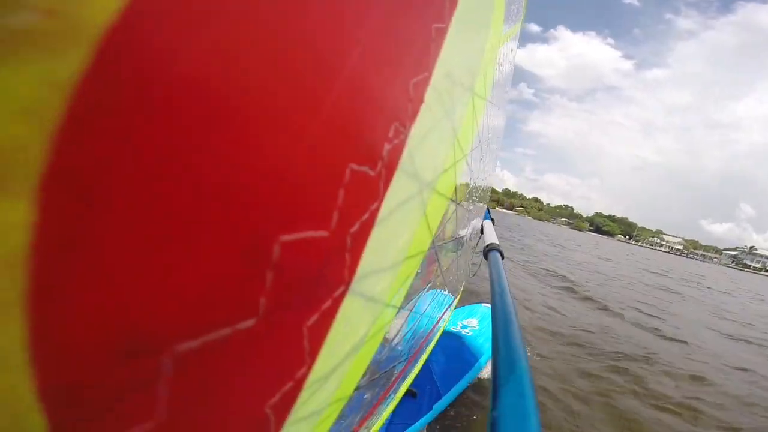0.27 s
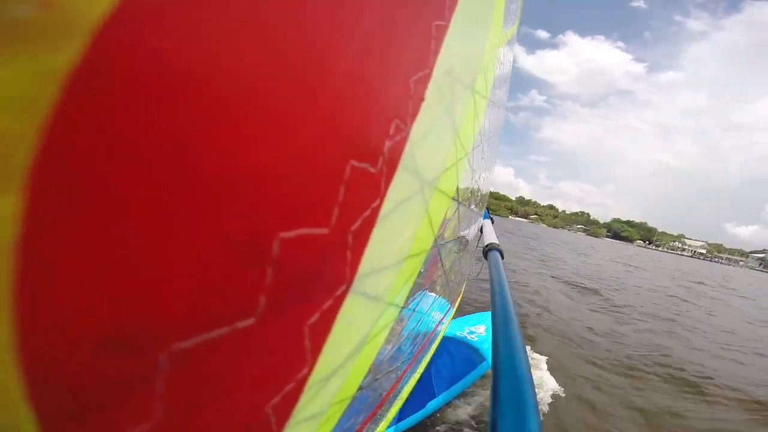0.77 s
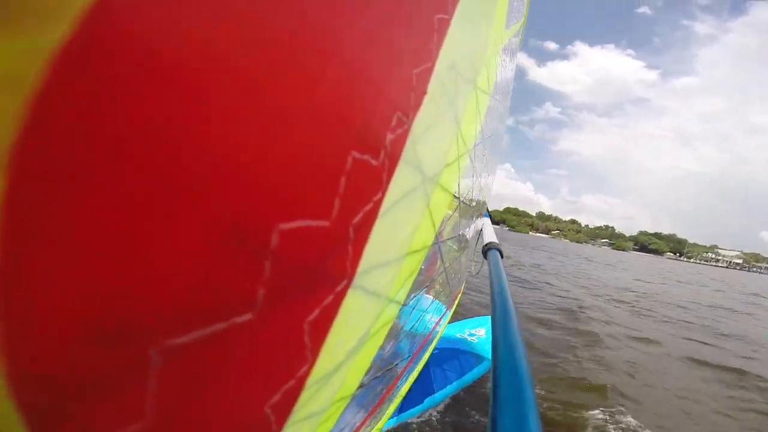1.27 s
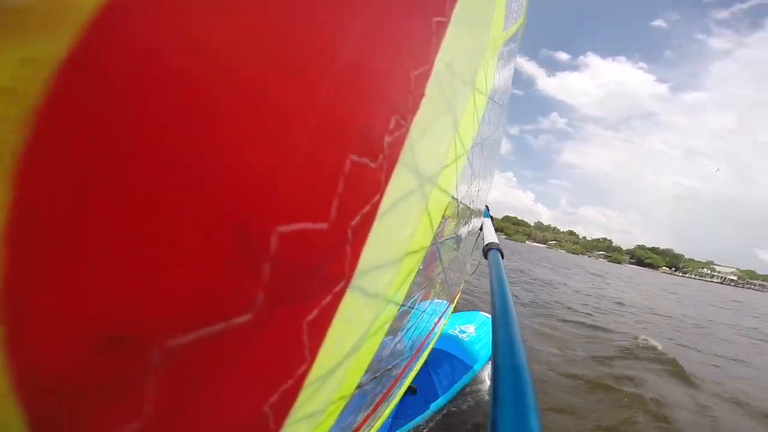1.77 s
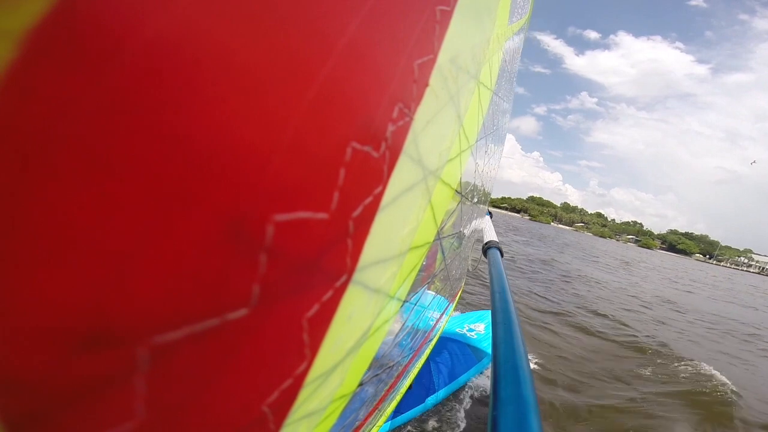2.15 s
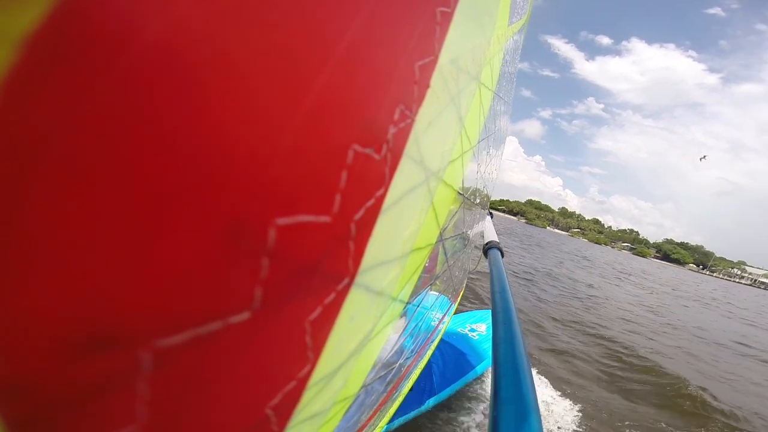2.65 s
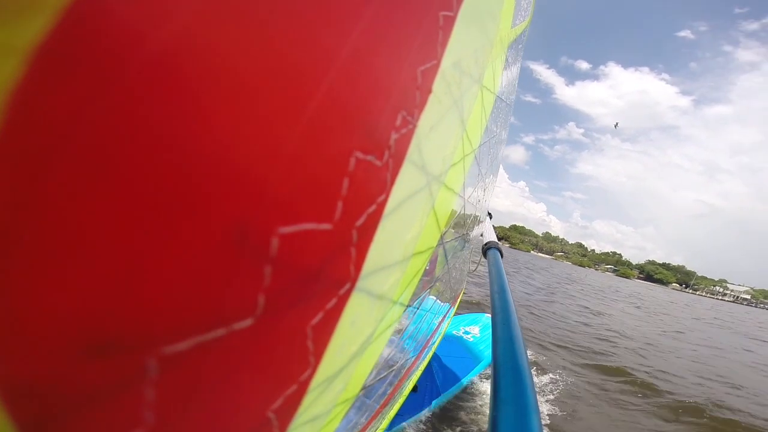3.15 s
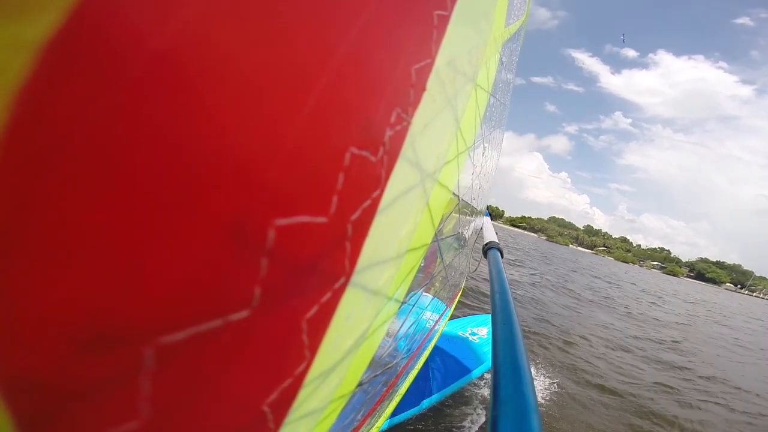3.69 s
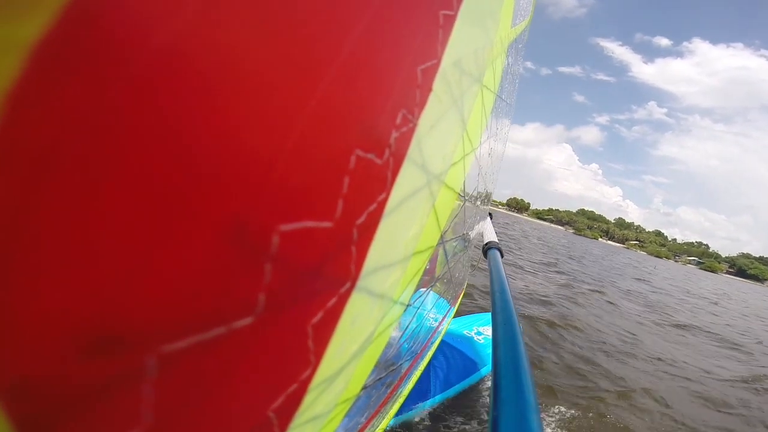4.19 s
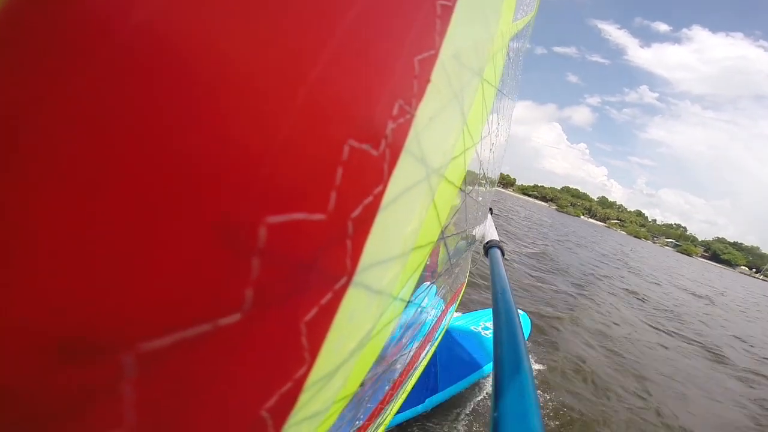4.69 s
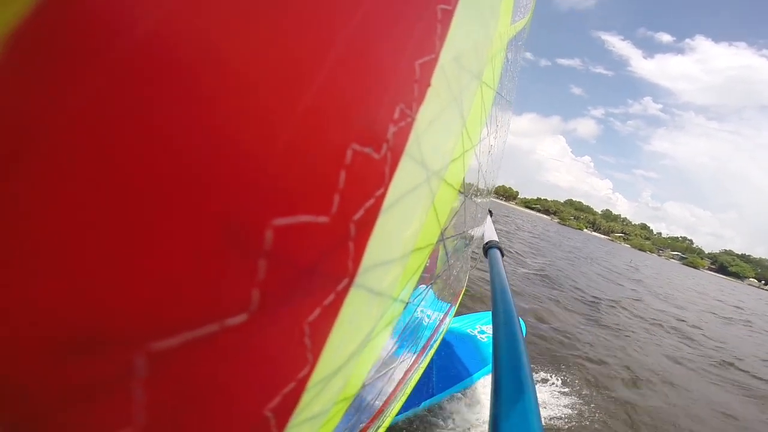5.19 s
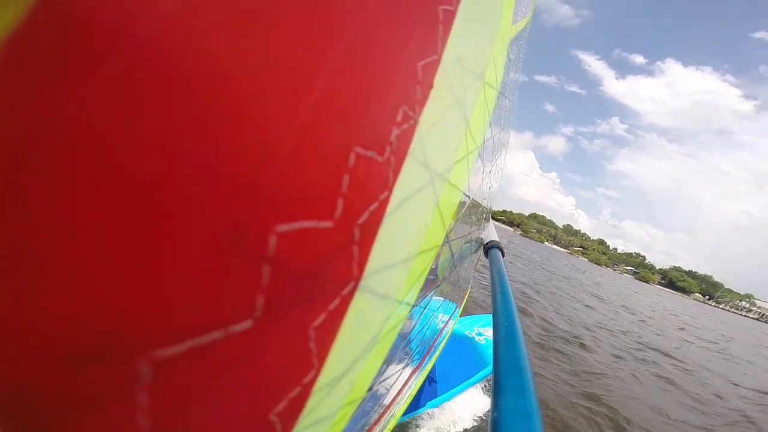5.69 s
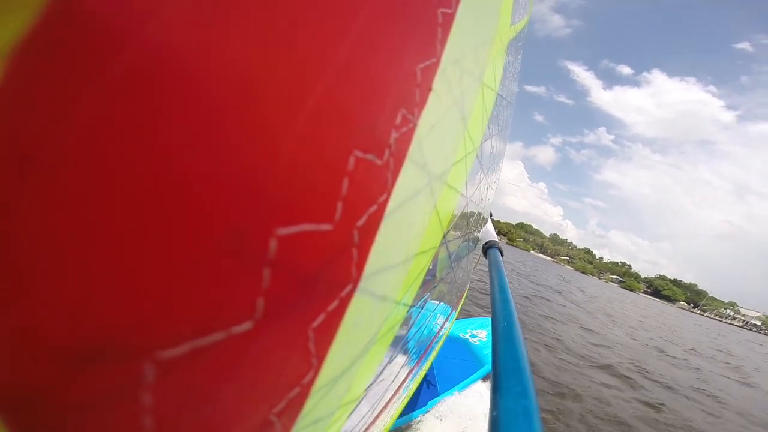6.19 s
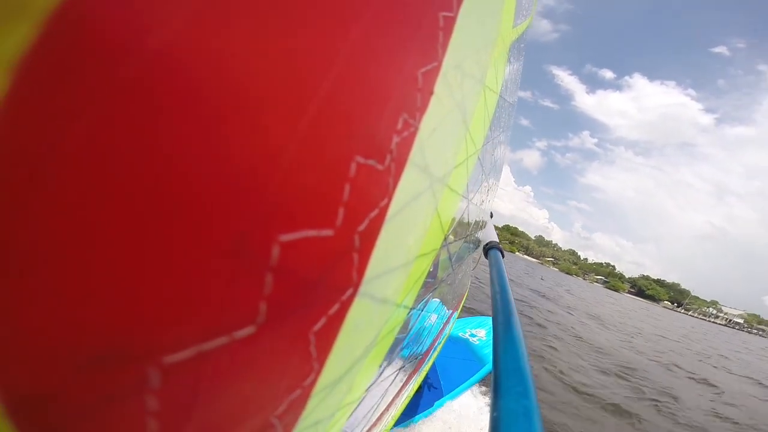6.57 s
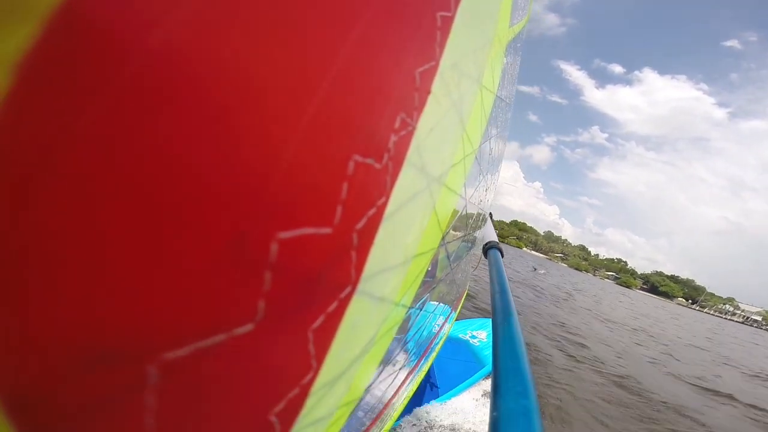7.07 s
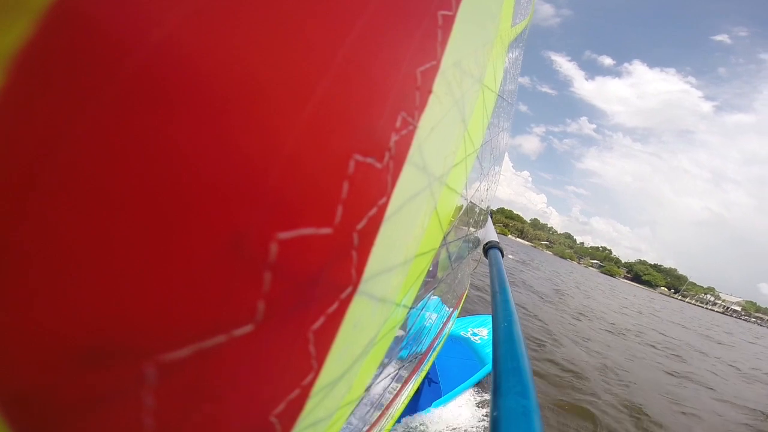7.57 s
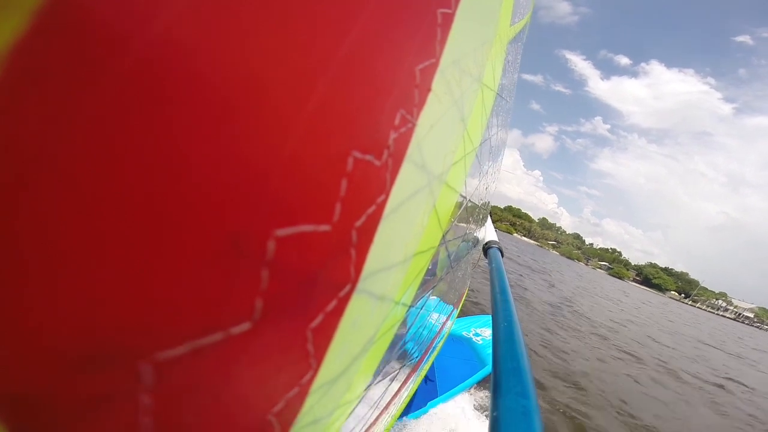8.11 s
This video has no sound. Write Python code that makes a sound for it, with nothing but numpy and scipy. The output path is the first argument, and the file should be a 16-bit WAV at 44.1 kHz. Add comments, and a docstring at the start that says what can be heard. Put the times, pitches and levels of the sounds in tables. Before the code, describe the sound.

Muffled, boomy knocks and cracks of waves slapping a windsurf rig, heard inside a plastic housing, with deep rumble, clamp creaks and thin water hiss.

```python
"""Wave slaps crack, knock and thud through the boom of a windsurf rig planing over chop: clicks set its modes ringing.
They are heard by a microphone in a closed plastic housing clamped to that boom.
The clamp creaks in trains of slips and snaps in single ones; the housing rattles in short bursts of noise.
Wind and waves shake the boom in a deep rumble of narrow noise bands; the rush of water is a thin, resonant
hiss through the housing wall over a dull wash of banded noise."""
import sys
import numpy as np
from scipy import signal
from scipy.io import wavfile
from scipy.ndimage import uniform_filter1d

SR = 44100
rng = np.random.default_rng(int(sys.argv[2]) if len(sys.argv) > 2 else 0)


def wav_record(signal):
    """Record a signal, one row per channel, as 16-bit PCM in the file named by sys.argv[1]."""
    frames = np.transpose(np.atleast_2d(signal))
    bounded = np.clip(frames, -1, 1)
    # unit amplitude maps onto the largest positive 16-bit level
    quanta = np.round(bounded * 32767).astype(np.int16)
    wavfile.write(sys.argv[1], SR, quanta)


N = 367794  # samples


def from_db(db):
    """Decibels to an amplitude factor."""
    return 10 ** (np.asarray(db) / 20)


def rms_one(x):
    """Scale a signal to an rms of 1."""
    return x / np.sqrt(np.mean(x ** 2) + 1e-20)


def in_time(rows):
    """Columns of a curve table, drawn as straight lines with one value per sample."""
    s, *columns = np.transpose(rows)
    return [np.interp(np.arange(N) / SR, s, column) for column in columns]


def drift(rate_hz):
    """Slow chance of spread 1: coarse noise through a double one-pole low-pass."""
    step = 40  # samples between coarse points
    r = np.exp(-2 * np.pi * rate_hz * step / SR)
    coarse = rng.standard_normal(N // step + 2002)
    slow = signal.lfilter([1], [1, -2 * r, r * r], coarse)[2000:]  # skip the filter's run-in
    return np.interp(np.arange(N) / step, np.arange(len(slow)), rms_one(slow))


def ring(clicks, hz, t60, phase):
    """A unit click sets a sine of height 1 ringing from the given phase; it falls 60 dB in t60 seconds."""
    r = np.exp(-np.log(1000) / (t60 * SR))
    w = 2 * np.pi * hz / SR
    b, a = [np.sin(phase), r * np.sin(w - phase)], [1, -2 * r * np.cos(w), r * r]
    return signal.lfilter(b, a, clicks + 1e-18)


def resonance(x, hz, width_hz):
    """Band-pass with gain 1 on top, passed twice for steep flanks."""
    r = np.exp(-np.pi * width_hz / SR)
    b = (1 - r * r) / 2 * np.array([1, 0, -1])
    a = [1, -2 * r * np.cos(2 * np.pi * hz / SR), r * r]
    return signal.lfilter(b, a, signal.lfilter(b, a, x))


def butter(x, hz, kind, order=2):
    """Butterworth filter."""
    return signal.sosfilt(signal.butter(order, hz, kind, fs=SR, output="sos"), x)


def banded_noise(spectrum, patchy_db):
    """Half-octave noise bands, each with its own flicker on a shared swell; rms 1."""
    hz, level_db = np.transpose(spectrum)
    edges = hz[0] * np.sqrt(2) ** np.arange(int(2 * np.log2(hz[-1] / hz[0])) + 2)
    together = drift(32.0)
    white = rng.standard_normal((2, N))  # neighbouring bands use different noise
    out = 0
    for k, (low, high) in enumerate(zip(edges, edges[1:])):
        own_db = np.interp(np.log(low * high) / 2, np.log(hz), level_db)
        flicker_db = patchy_db * (0.89 * together + drift(26.0))
        out = out + from_db(own_db + flicker_db) * butter(white[k % 2], [low, high], "band")
    return rms_one(out)


def strike(modes, at_s, level_db, spread_db, signs, tilt_db=0, phase=0):
    """Every blow rings all modes, in wandering shares; thrown modes (phase > 0) start alike, others in turn."""
    at = np.minimum((at_s * SR).astype(int), N - 1)
    out = np.zeros(N)
    for k, (hz, mode_db, t60) in enumerate(modes):
        clicks = np.zeros(N)
        share_db = mode_db + tilt_db * np.log2(hz / 1000) + spread_db * drift(33.7)[at]
        np.add.at(clicks, at, signs * from_db(level_db + share_db))
        direction = 1 if phase else (-1) ** k
        out += direction * ring(clicks, hz, t60, phase)
    return out


# Plastic housing resonances. Each row: frequency in Hz, width in Hz, share in the hiss in dB,
# share in the rattle in dB.
HOUSING = [(1753, 745, 5, 12), (2330, 880, -19, 6.5), (2998, 410, 10.5, -37), (3810, 130, -3.5, 5),
           (4375, 530, -6.5, -19.5), (5080, 650, -6, -44), (6040, 470, -10.5, 4), (6840, 2700, -19, -24.5),
           (9400, 830, -23, -15.5), (11700, 4100, -28.5, -43)]


def housing(x, column):
    """The housing resonances, weighted by one column of their table."""
    return sum(from_db(row[column]) * resonance(x, row[0], row[1]) for row in HOUSING)


# Tone of the spray and of the wash. Each row: frequency in Hz, relative density in dB per Hz.
SPRAY = [(1000, 11.5), (2500, -2), (5000, -10.5), (9000, -40), (15000, -36.5)]
WASH = [(90, 20), (150, 11.5), (300, 1.5), (600, -3.5), (1000, -7), (1600, -29), (3000, -59)]
# The wash also drives the first boom mode; its level is relative to the banded wash.
WASH_BOOM_HZ, WASH_BOOM_WIDTH_HZ, WASH_BOOM_DB = 171.7, 30, -4.0


def rush(spray_db, wash_db):
    """Spray hiss through the housing wall and its resonances, brighter as it swells; a dull wash below."""
    gusts = drift(25)
    sung = 0
    for hz, width_hz, level_db, _ in HOUSING:
        flicker_db = 1.5 * (gusts + drift(56))
        sung = sung + from_db(level_db + flicker_db) * resonance(rng.standard_normal(N), hz, width_hz)
    hiss = 2.2 * rms_one(sung) + banded_noise(SPRAY, patchy_db=1.5)
    swell_db = spray_db - np.mean(spray_db)  # only the rise and fall of the curve counts
    low, high = butter(hiss, 3100, "low"), butter(hiss, 5300, "high")
    # The treble follows the whole swell, the lower hiss hardly moves.
    spray = from_db(-54.5 + 0.17 * swell_db) * low - from_db(-44.5 + swell_db) * high
    boom_wash = rms_one(resonance(rng.standard_normal(N), WASH_BOOM_HZ, WASH_BOOM_WIDTH_HZ))
    wash = banded_noise(WASH, patchy_db=1.6) + from_db(WASH_BOOM_DB) * boom_wash
    return spray + from_db(wash_db) * wash


def shaking(sway_db, hum_db):
    """Buffeting drives the two lowest bending ranges of the rig in shared lumps."""
    lumps = from_db(5.06 * drift(7.7))
    out = 0
    for hz, width_hz, level_db in ((34.6, 25, sway_db), (69.0, 26.0, hum_db)):
        rumble = rms_one(lumps * resonance(rng.standard_normal(N), hz, width_hz))
        out = out + from_db(level_db) * rumble
    return out


# Loud housing rattles. Each row: start in seconds, level in dB before the housing resonances.
RATTLES = [(1.379, -35), (1.405, -37), (1.437, -33.5), (2.183, -31), (3.083, -33), (3.419, -33),
           (4.776, -35), (5.108, -31), (5.607, -21.5), (5.701, -28.5), (8.003, -30.5)]
RATTLE_S = 0.016  # length of a loud or slap rattle
# Every slap rattles the housing: dB at a 0 dB knock, and dB gained per dB of knock.
SLAP_RATTLE_DB, SLAP_RATTLE_FOLLOWS = -25.5, 0.66


def rattles():
    """Fine chatter in the housing resonances: at each slap, in loud bursts, and in faint ones at random."""
    faint_per_s = 14
    starts = (rng.random(N) < faint_per_s / SR) * from_db(-44.5 + 3.3 * rng.standard_normal(N))
    gate = 500 * uniform_filter1d(starts, size=500)  # each faint burst lasts 500 samples
    slap_bursts = [(row[0], SLAP_RATTLE_DB + SLAP_RATTLE_FOLLOWS * row[2]) for row in SLAPS]
    for s, level_db in [*RATTLES, *slap_bursts]:
        gate[int(s * SR):int((s + RATTLE_S) * SR)] += from_db(level_db)
    soft_gate = uniform_filter1d(gate, size=120)
    chatter = soft_gate * rng.standard_normal(N) * from_db(0.82 * drift(130))
    return housing(chatter, 3)


# Clamp creaks. Each row: start in seconds, length in seconds, relative level in dB.
CREAKS = [(0.034, .006, -31), (0.045, 0.012, -13), (0.118, 0.0066, -32.5), (1.464, 0.022, -33),
          (1.509, 0.18, -5.5), (1.715, 0.0072, -19), (1.752, 0.01, -13), (1.83, 0.058, -15.5),
          (1.914, 0.001, -21), (2.141, 0.059, -20.5), (2.193, 0.013, -19.5), (2.212, 0.0073, -10.5),
          (2.237, 0.0031, -10.5), (2.439, 0.0064, -20.5), (2.642, 0.019, -24.5), (2.847, 0.044, -5.5),
          (3.111, 0.0078, -19.5), (3.228, 0.0096, -11.5), (3.243, 0.0058, -7), (3.26, 0.0052, -8),
          (4.433, .006, -22), (4.484, 0.0062, -18.5), (4.638, 0.0026, -18.5), (4.665, 0.0073, -19),
          (5.068, 0.027, -12.5), (5.752, 0.0073, -16), (7.33, 0.0059, -16.5)]
# Clamp body modes and upper modes. Each row: frequency in Hz, share in dB, t60 in seconds.
CLAMP = [(285, 5, 0.032), (511, 3, 0.044), (615, 8, 0.015), (764, -2, 0.051), (883, 5, 0.0099),
         (1080, 6.5, 0.02), (1272, 5, 0.01), (1477, 1, 0.015), (1784, -2, 0.022)]
CLAMP_TOP = [(2330, -18, 0.021), (2660, -13.5, 0.0089), (3770, -25, 0.02), (4520, -24, 0.0054)]
# A long, hard creak starts this many dB down, is up at this share of its length,
# and has gained a little more by its end.
CREAK_START_DOWN_DB, CREAK_TOP, CREAK_END_GAIN_DB = 20, 0.38, 2
# Body tilt in dB per octave about 1 kHz: its base, its gain per second of creak length (longer
# creaks rub brighter), and its loss per second elapsed (a long creak dulls as it goes on).
CREAK_TILT_DB, TILT_DB_PER_S, TILT_FALL_DB_PER_S = -1.5, 28.5, 22.5


def creaks():
    """Stick-slip in the clamp: a light creak slips slowly and evenly, a hard one fast and unevenly."""
    at_s, level_db, signs, tilt_db = [], [], [], []
    for s, length, creak_db in CREAKS:
        force = np.clip((creak_db + 19.5) / 10.0, 0, 1)  # 0 light, 1 hard
        chance = rng.standard_normal((3, 200))
        slips_per_s = 240 + 650 * force
        gaps = from_db((0.6 + 2.5 * force) * chance[0, 1:]) / slips_per_s
        since = np.cumsum(np.r_[0, gaps])
        inside = s + since <= s + length
        contour_db = np.interp(since, [0, CREAK_TOP * length, length],
                               [-CREAK_START_DOWN_DB, 0, CREAK_END_GAIN_DB])
        swell_db = force * min(length / 0.058, 1) * contour_db
        slip_db = creak_db - 6.23 * force + swell_db + (1 + 3 * force) * chance[1]
        slip_tilt_db = CREAK_TILT_DB + TILT_DB_PER_S * length - TILT_FALL_DB_PER_S * since
        slip_signs = np.sign(chance[2] + 3 * (1 - force))  # light slips nearly all jerk the same way
        at_s += list((s + since)[inside])
        level_db += list(slip_db[inside])
        signs += list(slip_signs[inside])
        tilt_db += list(slip_tilt_db[inside])
    at_s, level_db, signs = np.array(at_s), np.array(level_db), np.array(signs)
    body = strike(CLAMP, at_s, level_db, 3.0, signs, np.array(tilt_db))
    top = strike(CLAMP_TOP, at_s, level_db, 3.0, signs)
    both = butter(body, 2140, "low", order=8) + butter(top, [1950, 5000], "band", order=4)
    return from_db(-5.0) * both


# Clamp snaps. Each row: start in seconds, relative level in dB.
SNAPS = [(4.613, -13), (5.73, -14.5), (5.777, -11.5)]
SNAP_TOP_DB, SNAP_THIN_HZ = 14.5, 915  # lift of the upper modes; body modes thinned below this


def snaps():
    """A hard single slip with a quick rebound rings the clamp, its upper modes lifted."""
    s, level_db = np.transpose(SNAPS)
    s = np.r_[s, s + 0.0022]  # rebound 2.2 ms later, 3 dB softer
    level_db = np.r_[level_db, level_db - 3.0]
    body, top = (strike(modes, s, level_db, 3.5, np.ones(len(s))) for modes in (CLAMP, CLAMP_TOP))
    bright = butter(body, SNAP_THIN_HZ, "high") + from_db(SNAP_TOP_DB) * top
    return butter(bright, 4100, "low", order=3)


# Wave slaps. Each row: start in seconds, crack peak in dB, knock in dB, deep thud in dB;
# knock and thud are blow levels before the mode shares.
SLAPS = [(0.24, -32, -36, -16.5), (0.306, -21.5, -40.5, -10.5), (1.326, -45, -46.5, -20),
         (2.088, -35.5, -22, -12.5), (2.177, -35, -15, -30), (2.239, -28, -24.5, -10),
         (2.384, -40, -21, -8.5), (2.509, -13.5, -9, -30.5), (2.662, -14, -19, -31),
         (3.013, -36, -26, -18.5), (3.137, -56, -38.5, -12.5), (3.181, -41, -18.5, -19),
         (3.31, -33, -11, -27), (3.478, -37, -18, -25.5), (3.546, -16.5, -15, -4.5),
         (3.697, -18, -28.5, -14.5), (3.891, -25, -38.5, -13), (4.049, -33, -28, -20.5),
         (4.106, -34.5, -35, -16), (4.24, -29.5, -27, -1.5), (4.274, -34, -16.5, -20),
         (4.324, -23.5, -22, -6), (4.346, -36.5, -20, -5), (4.376, -19, -13, -13.5),
         (4.413, -25.5, -14, -4), (4.499, -10, -9, -0.5), (4.531, -11, -10, -3), (4.601, -10, -6.5, 0),
         (4.661, -40.5, -20, -7.5), (4.977, -36, -16.5, -19.5), (5.108, -19, -25, -11.5),
         (5.201, -31.5, -24, -28), (5.364, -39, -18, -16), (5.451, -27.5, -24, -1),
         (5.58, -13.5, -1.5, -37), (5.605, -8.5, -35.5, -11), (5.639, -20, -14, -15.5),
         (5.691, -25, -9, -15), (5.775, -25.5, -16.5, -0.5), (5.875, -14, -15, -17),
         (6.124, -35, -18.5, -7), (6.178, -17.5, -11.5, -5.5), (6.229, -42.5, -21, -7),
         (6.251, -32, -39, -8), (6.306, -23.5, -11.5, -12.5), (6.428, -35, -10, -19),
         (6.719, -37, -12, -11), (6.771, -45, -15.5, -18.5), (6.83, -26.5, -13, -10),
         (6.941, -14, -15, -13.5), (7.003, -32, -24, -3.5), (7.086, -41, -22, -17.5),
         (7.135, -45, -31, -6.5), (7.246, -23, -17, -10.5), (7.288, -13, -15, -2),
         (7.351, -14.5, -7.5, -26.5), (7.502, -16, -16, -7.5), (7.537, -19, -11.5, -14.5),
         (7.639, -19.5, -10.5, -38.5), (7.73, -19, -14, -5), (7.757, -23, -8.5, -9.5),
         (7.824, -19, -7.5, -23.5), (7.883, -27, -17, -7), (7.929, -36, -26.5, -10),
         (7.963, -16, -8.5, -30), (8.183, -16.5, -16.5, -29.5), (8.228, -44, -16, -16.5),
         (8.294, -21.5, -11.5, -30)]
# Boom modes of the knock and of the thud. Each row: frequency in Hz, share in dB, t60 in seconds.
BOOM = [(168.2, 8, 0.096), (244, -5.5, 0.0087), (287, -3.5, 0.014)]
BOOM_DEEP = [(43.7, 5, 0.098), (78.2, 4.13, 0.2)]
CRACK_HZ, CRACK_FADE_S = (198, 1430), 0.0054  # band of the crack; time constant of its splutter
CRACK_NOISE_DB = -9.0  # splutter behind the needle of a crack
KNOCK_LAG_S = 0.000989  # the boom swings back this long after the crack
JOLT_PHASE = 0.36  # radians; starting phase of the thrown boom modes


def slaps():
    """A blunt blow, given one direction here: a needle-like crack, then thud and knock as the boom swings back."""
    s, crack_db, knock_db, thud_db = np.transpose(SLAPS)
    spread_db, signs = 2.5, -np.ones(len(s))
    knock = strike(BOOM, s + KNOCK_LAG_S, knock_db, spread_db, signs, phase=JOLT_PHASE)
    thud = strike(BOOM_DEEP, s + KNOCK_LAG_S, thud_db, spread_db, signs, phase=JOLT_PHASE)
    clicks = np.zeros(N)
    clicks[(s * SR).astype(int)] = from_db(crack_db)
    fade = signal.lfilter([1], [1, -np.exp(-1 / (CRACK_FADE_S * SR))], clicks + 1e-18)
    per_band = SR / (2 * (CRACK_HZ[1] - CRACK_HZ[0]))  # makes up for what the band filter removes
    splutter = from_db(CRACK_NOISE_DB) * np.sqrt(per_band) * fade * rng.standard_normal(N)
    crack = butter(per_band * clicks + splutter, CRACK_HZ, "band")
    return butter(knock + thud, 446, "low", order=3) + butter(crack, 4100, "low")


# Rise and fall of the rig's low shaking. Each row: time in seconds, slow sway in dB, boom hum in dB.
SHAKE = [(0.0, -12, -33), (0.42, -9, -35.5), (0.67, -16, -61), (1.32, -16.5, -29), (1.81, -12, -38.5),
         (2.32, -12.5, -11), (2.79, -14.5, -23.5), (3.97, -12, -28.5), (4.41, -21.5, -14),
         (4.85, -16.5, -22), (5.2, -15.5, -18), (8.34, -22.5, -18)]
# Rush of water. Each row: time in seconds, spray treble in dB (used about its mean), low wash in dB.
RUSH = [(0, -71.5, -22.5), (.3, -69.5, -33.5), (.75, -69, -31), (1.4, -75.5, -23), (2.4, -66.5, -24.5),
        (2.8, -72, -25.5), (4.4, -71.5, -28), (4.85, -70.5, -21.5), (5.7, -69, -25), (6.0, -65.5, -26),
        (6.65, -59.5, -22), (6.85, -65, -23.5), (7.22, -65, -26.5), (7.35, -69.5, -25.5), (7.9, -64, -20),
        (8.34, -59.5, -19.5)]
# One wave sloshes over the deck: centre, half length, and swell of the wash.
SLOSH_S, SLOSH_HALF_S, SLOSH_DB = 5.775, 0.04, 12


def scene():
    """All sources meet at the one microphone; the low wash swells with each jolt of the rig."""
    rig = shaking(*in_time(SHAKE)) + slaps()
    power = uniform_filter1d(rig ** 2, size=900) / np.mean(rig ** 2)
    jolt_db = 10 * np.log10(power + 0.0041)
    spray_db, wash_db = in_time(RUSH)
    slosh_db = SLOSH_DB * np.exp(-((np.arange(N) / SR - SLOSH_S) / SLOSH_HALF_S) ** 2)
    water = rush(spray_db, wash_db + slosh_db + 0.67 * jolt_db)
    return (rig + creaks() + snaps() + rattles() + water)[None]


def record(dry):
    """Gain control pulls loud peaks down and recovers slowly; peaks are rounded, bass and top are cut."""
    x = butter(dry, 30.0, "high")
    over_db = np.maximum(20 * np.log10(np.abs(x) + 1e-9) + 0.5, 0)  # excess above -0.5 dB
    release_db = 9.06 * np.arange(N) / SR  # recovers 9.06 dB per second
    held_db = np.maximum.accumulate(over_db + release_db, axis=1) - release_db
    # The centred average starts to pull down shortly before a peak.
    x = x * from_db(-uniform_filter1d(held_db, size=300, axis=1))
    x = 1.193 * np.tanh(x / 1.348)
    top_cut = signal.cheby2(16, 50, 15450, fs=SR, output="sos")  # 50 dB down from 15450 Hz up
    return signal.sosfilt(top_cut, x)


dry = scene()
out = record(dry)
wav_record(out)
```